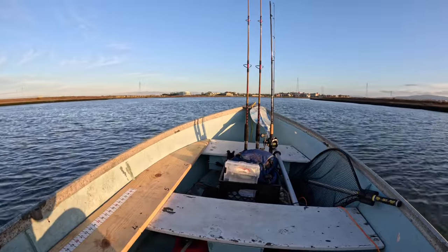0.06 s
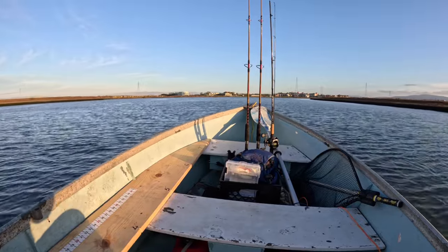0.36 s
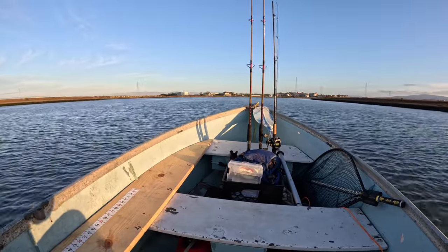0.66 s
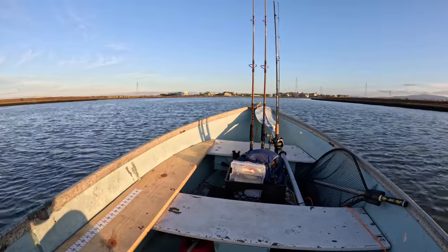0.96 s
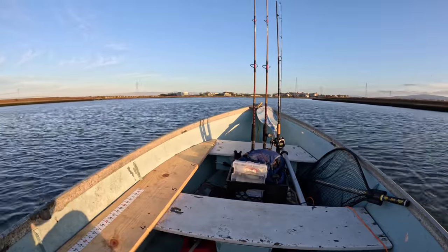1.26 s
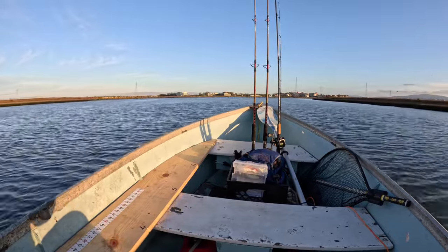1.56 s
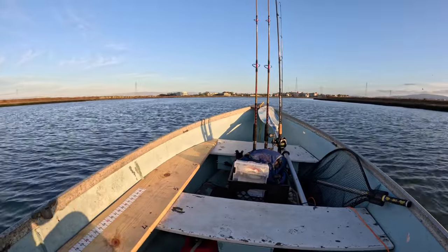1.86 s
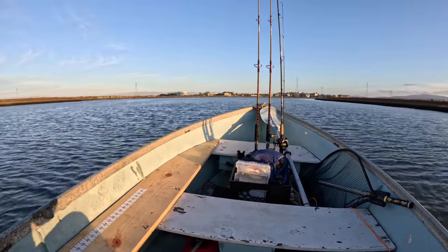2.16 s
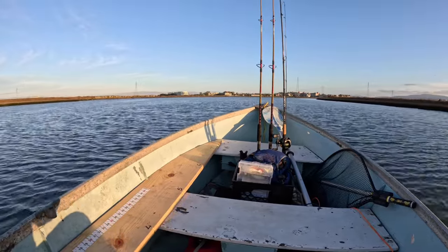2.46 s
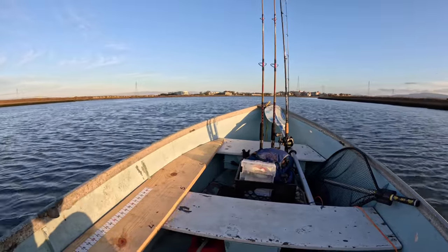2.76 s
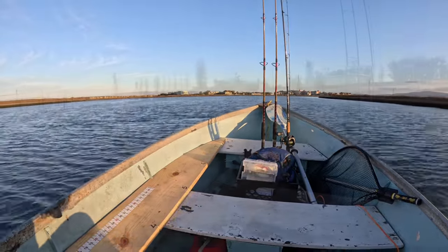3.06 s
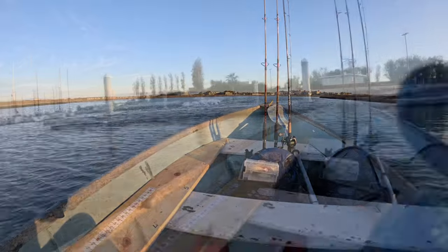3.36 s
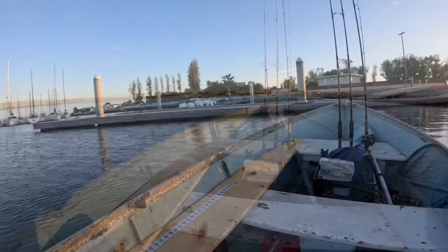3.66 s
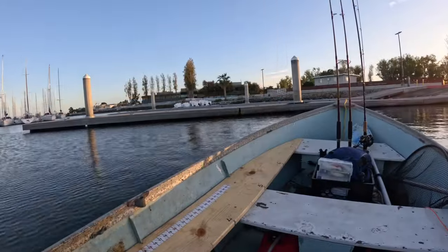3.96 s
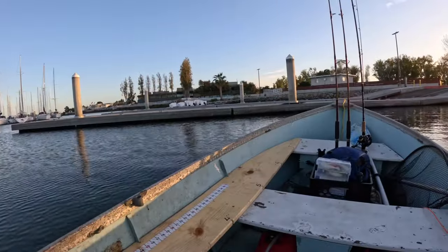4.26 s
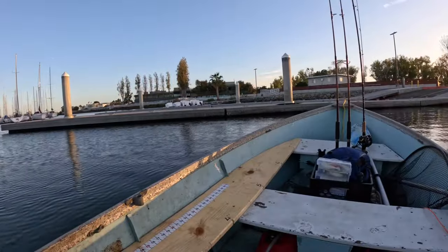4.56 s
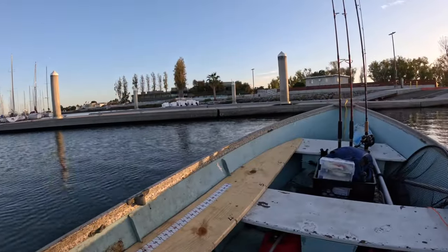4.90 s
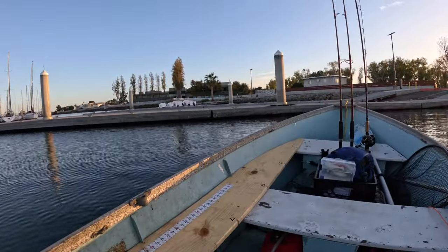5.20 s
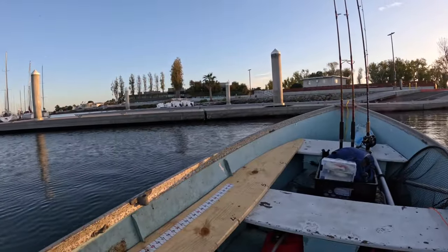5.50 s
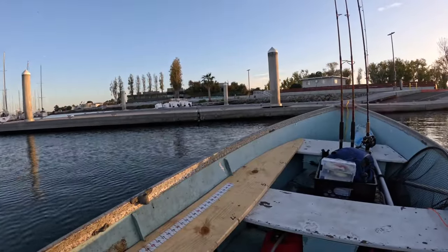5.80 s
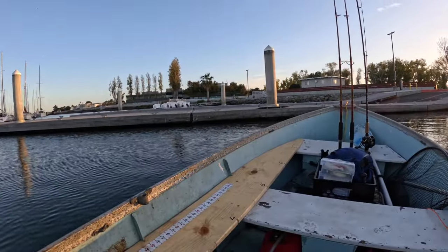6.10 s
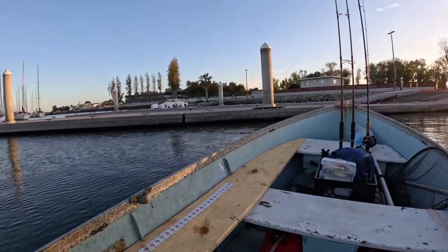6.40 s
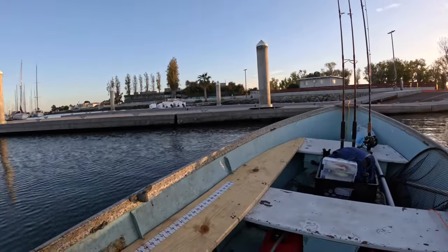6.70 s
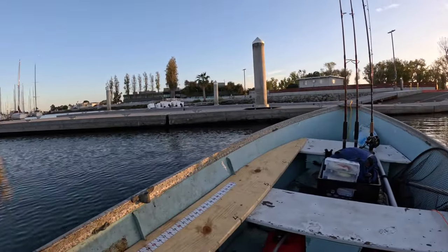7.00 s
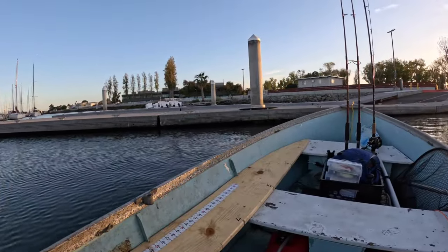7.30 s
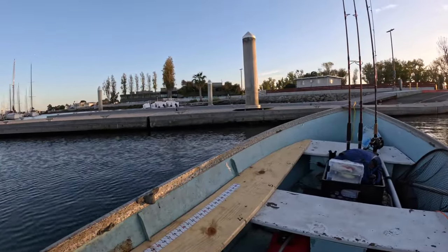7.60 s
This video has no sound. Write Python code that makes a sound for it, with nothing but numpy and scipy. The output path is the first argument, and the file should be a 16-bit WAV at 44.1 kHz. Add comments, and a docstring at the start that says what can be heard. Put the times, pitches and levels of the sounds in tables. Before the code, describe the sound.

A skiff runs across open water, its outboard motor holding one loud note above the wash of the bow. The drone gives way to a lower, quieter throb that keeps slowing and turns uneven, with water gurgling alongside. A short dry creak comes next, then a soft hiss of foam. The microphone is in the boat, catching little slaps on the hull, faint ticks and a low rumble of wind.

```python
"""A small boat with a four-stroke outboard motor, heard from aboard. First the motor drones at cruising
speed over the rush of the bow wave. From about 3 to 4 s that fades into slow running, and the throttle
eases to a lumpy putter that booms in the hull. Near 5.6 s a fitting creaks for half a second as it
sticks and slips; then a small wave breaks into fizzing foam. All along, water slaps the hull, loose gear
ticks and wind brushes the microphone."""
import sys
import numpy as np
from scipy.fft import rfft, irfft, next_fast_len
from scipy.io import wavfile
from scipy.ndimage import uniform_filter1d, map_coordinates

SR = 44100
rng = np.random.default_rng(int(sys.argv[2]) if len(sys.argv) > 2 else 0)


def wrap_up_sound(samples):
    """Save the sound to the file named by the first command line argument, as 16-bit audio."""
    columns = np.atleast_2d(samples).T
    # keep every value between -1 and 1, then stretch to whole-number steps
    tamed = np.clip(columns, -1, 1)
    steps = np.round(tamed * 32767).astype(np.int16)
    wavfile.write(sys.argv[1], SR, steps)


N = 346185

# crests and troughs that the boat runs through: (time [s], half length [s], rise [dB])
WAVE_CRESTS = [(1.78, 0.038, 4.5), (2.04, 0.038, 1), (2.82, 0.12, 1), (3.22, 0.073, 1), (4.62, 0.16, 5.5),
               (5.6, 0.29, -1), (6.26, 0.054, 1.5), (6.78, 0.24, 1)]
# the motor slows as the throttle is eased in steps: (time [s], crankshaft speed [Hz])
SLOW_SPEED = [(3.7, 47.9), (4.02, 48.8), (4.57, 48.4), (4.68, 47.8), (4.76, 46.6), (4.96, 45.6),
              (5.19, 45.0), (5.33, 43.9), (5.54, 43.3), (5.81, 43.0), (6.0, 41.5), (6.12, 39.6),
              (6.33, 38.6), (6.52, 35.9), (6.69, 36.1), (7.04, 33.8), (7.45, 32.8), (7.85, 32.6)]
SMOOTH_HZ, LUMPY_HZ = 48, 43  # firing is almost even above the first speed, lumpy below the second


def amp(db):
    """Decibels to gain."""
    return 10 ** (np.asarray(db) / 20)


def unit(x):
    """Scale to rms 1."""
    return x / np.sqrt(np.mean(x ** 2) + 1e-20)


def curves(rows):
    """One value per sample for each column after the time."""
    s, *cols = np.transpose(rows)
    return [np.interp(np.arange(N) / SR, s, c) for c in cols]


def wobble(rate):
    """A smooth random curve, rate knots a second."""
    return map_coordinates(rng.standard_normal(int(N * rate / SR) + 4), [np.arange(N) * rate / SR])


def coloured(x, spectrum):
    """x through a causal filter with the given (Hz, dB) points, falling away beyond both ends."""
    m = 2 * next_fast_len(N // 2 + SR // 4)
    f, db = np.transpose(spectrum)
    log_hz = np.log(np.fft.rfftfreq(m, 1 / SR) + 1)
    gain_db = np.interp(log_hz, np.log(np.r_[f[0] / 2, f, f[-1] * 2]), np.r_[db[0] - 20, db, -100])
    cepstrum = irfft(np.log(amp(gain_db)))
    cepstrum[1:m // 2] *= 2  # minimum phase: nothing rings before it is struck
    cepstrum[m // 2 + 1:] = 0
    return irfft(rfft(x, m) * np.exp(rfft(cepstrum)), m)[:N]


def resonate(x, modes):
    """x through damped resonances."""
    m = next_fast_len(N + SR // 2)
    f = np.fft.rfftfreq(m, 1 / SR)
    return irfft(rfft(x, m) * sum(amp(db) * 1j * f * w / (c * c - f * f + 1j * f * w)
                                  for c, w, db in modes), m)[:N]


def rush(spectrum, gate=1):
    """Gated noise in a spectrum, rms 1."""
    return unit(coloured(gate * rng.standard_normal(N), spectrum))


def bubbles(per_second, centre_hz, cycles, spread_db, size=900):
    """Damped, slightly rising rings of random pitch and strength, rms 1."""
    u = rng.random((int(per_second * N / SR), 3))
    hz = centre_hz * 2 ** (2 * u[:, 1:2] - 1)
    turns = hz * np.arange(size) / SR
    age = turns / cycles
    ring = (np.sin(2 * np.pi * turns * (1 + 0.06 * np.minimum(age, 2)))
            * np.exp(-2 * age) * (1 - np.exp(-2 * turns)))
    ring *= amp(spread_db * u[:, 2:] ** 4)
    at = (u[:, :1] * N).astype(int) + np.arange(size)
    return unit(np.bincount(at.ravel(), ring.ravel(), N)[:N])


def knocks(rows, t60, attack_cycles, width, size=8192):
    """Each contact is a short swell of noise that rings about its own pitch; high ones start faster."""
    out, t, f = np.zeros(N + size), np.arange(size) / SR, np.fft.rfftfreq(size, 1 / SR)
    for s, db, hz in rows:
        band = 1 / (1 + ((f - hz) / (width * hz)) ** 2)
        ring = unit(irfft(band * np.exp(2j * np.pi * rng.random(len(f)))))
        out[round(s * SR):][:size] += (amp(db - 60 * t / t60)
                                       * (1 - np.exp(-t * hz / attack_cycles)) * ring)
    return out[:N]


def swells(rows):
    """A rise in dB made of bell-shaped humps (s, half length s, dB)."""
    t = np.arange(N) / SR
    return sum(db * np.exp(-((t - s) / half) ** 2) for s, half, db in rows)


def wind(slow_share):
    """The headwind buffets the microphone, less as the boat slows."""
    # gusts and lulls: (time [s], half length [s], rise [dB])
    gusts = [(.08, 0.11, 0), (1.78, 0.19, 4.5), (2.7, 0.19, 4.5), (4.27, 0.14, -8), (4.9, .12, 3),
             (5.4, 0.09, 5.5), (5.95, .1, -5), (6.95, 0.18, 5)]
    # the deep rumble of the air: (frequency [Hz], level [dB])
    buffet_spectrum = [(12, -10.5), (25, -3), (50, -2.5), (90, -4.5), (130, -6.5), (250, -11)]
    shaft_hz, = curves(SLOW_SPEED)
    fast_db, slow_db = -28.5, -29 + 9 * np.log2(shaft_hz / SMOOTH_HZ)
    wind_db = (1 - slow_share) * fast_db + slow_share * slow_db + swells(gusts)
    return amp(wind_db + 0.57 * wobble(7.4) + 0.43 * wobble(20)) * rush(buffet_spectrum)


def loose_gear():
    """Loose things aboard knock together with light ticks."""
    # each tick: (time [s], relative level [dB], pitch [Hz])
    ticks = [(.141, -46, 4450), (.325, -35, 2130), (.425, -51, 4450), (1.174, -45, 4065),
             (1.258, -47, 3860), (1.342, -49, 4800), (4.255, -46, 3350), (4.368, -52, 3500),
             (6.14, -46, 3250), (7.726, -46.5, 4150)]
    return amp(1.5) * knocks(ticks, t60=0.087, attack_cycles=6, width=0.32)  # t60: seconds to fade


def flung_drops():
    """Single drops of water tap the hull."""
    # each drop: (time [s], level [dB], pitch [Hz])
    drops = [(3.884, -51, 5600), (3.946, -54, 7200), (4.09, -56, 8600), (4.245, -57, 8400),
             (4.629, -46.5, 5000), (5.258, -43.5, 4580), (6.473, -45, 3500), (6.695, -47, 4200),
             (7.081, -57, 6700), (7.445, -55, 5170)]
    return knocks(drops, t60=0.032, attack_cycles=3.6, width=.2)


def fine_spray():
    """A mist of tiny drops patters briefly, around 4 s."""
    # the mist's high hiss: (frequency [Hz], level [dB])
    mist_spectrum = [(4000, -7), (7000, 0), (9000, -1.5), (11000, -8), (14000, -17.5)]
    mist = unit(coloured(bubbles(1400, 7500, cycles=3, spread_db=7, size=200), mist_spectrum))
    return amp(-66.5) * swells([(3.95, .42, 1)]) * mist


def breaking_wave():
    """A small wave breaks and its foam hisses along the side."""
    # the foam's fizz: (frequency [Hz], level [dB])
    fizz_spectrum = [(1800, -20), (3500, 7), (6000, 0.5), (8000, -3), (9500, -12), (12000, -14),
                     (15000, -30)]
    start_s, rise_s, hold_s, fall_s = 6.36, 0.096, 0.23, 0.27
    times = start_s + np.cumsum([0, rise_s, hold_s, fall_s])
    envelope = np.interp(np.arange(N) / SR, times, [0, 1, 1, 0])
    return envelope * amp(-55.5 + 1.8 * wobble(60)) * rush(fizz_spectrum)


def hull_slaps():
    """Small waves slap the hull; the high 2.1 kHz knock near 3.1 s is a brief rattle."""
    # each slap: (time [s], relative level [dB], pitch [Hz])
    slaps = [(.134, -38.5, 1140), (.645, -40, 1000), (1.245, -30, 820), (1.348, -42, 1160),
             (1.784, -34.5, 1150), (1.888, -36, 1150), (2.017, -33.5, 1260), (2.1, -36, 1020),
             (2.351, -39, 1440), (2.85, -35, 1250), (3.07, -43, 2130), (3.329, -36, 1300), (4.61, -34, 373),
             (5.245, -33, 1050), (5.98, -26.5, 564), (6.26, -34, 1000), (6.64, -23, 368), (7.03, -32, 495)]
    return amp(3) * knocks(slaps, t60=.17, attack_cycles=7, width=.22)


def creak():
    """A fitting sticks and slips; every slip is a burst of rubbing noise that makes it ring."""
    # quick runs of slips: (time [s], length [s], relative level [dB], slip rate [Hz])
    slip_runs = [(5.594, 0.032, -43, 180), (5.607, 0.1, -30.5, 150), (5.83, 0.022, -46, 130),
                 (5.854, 0.036, -37, 210), (5.902, 0.076, -36.5, 190)]
    # single snaps: (time [s], relative level [dB])
    snaps = [(5.607, -47), (5.743, -22), (5.773, -26), (5.856, -32), (5.883, -42), (5.902, -42),
             (6.021, -28)]
    # the notes the fitting rings at: (pitch [Hz], width [Hz], level [dB])
    fitting_notes = [(990, 87, 7), (1570, 68, 2), (2300, 80, 4), (2890, 110, 1), (3760, 120, 2),
                     (5050, 140, 1.5), (5990, 150, -10), (6600, 170, -3.5)]
    # the dry rasp of rubbing: (frequency [Hz], level [dB])
    rasp_spectrum = [(500, -5), (740, 12), (1050, -16), (1350, -10), (1600, -10.5), (2400, -6.5),
                     (3850, -3.5), (4400, -12.5), (6000, -15.5), (7200, -29), (7700, -26), (9000, -30),
                     (11000, -38), (14000, -55)]
    t = np.arange(N) / SR
    rubbing = np.zeros(N)
    for s, length, db, slip_hz in slip_runs:
        since_slip = np.cumsum(slip_hz * (1 + 0.23 * wobble(83))) / SR % 1
        envelope = np.clip((t - s) / 0.0018, 0, 1) * np.clip((s + length - t) / 0.015 + .5, 0, 1)
        rubbing += envelope * amp(db - 31 * np.clip(t - s, 0, 1)) * np.exp(-1.1 * since_slip)
    for s, db in snaps:
        rubbing += (t > s) * amp(db - 9.5 - 60 * np.clip(t - s, 0, 1) / 0.05)
    scrape = rubbing * rng.standard_normal(N)
    soften = [(900, 11.5), (7000, -2.5), (9000, -12.5), (14000, -25.5)]  # (frequency [Hz], gain [dB])
    ring = unit(coloured(resonate(scrape, fitting_notes), soften))
    rasp = unit(coloured(scrape, rasp_spectrum))
    return amp(4) * np.std(scrape) * unit(rasp + 0.6 * ring)


def lapping_water(puffs, strokes, patter_db):
    """Water gurgles and splashes along the slow hull, pulsing with the motor; fine drops fall back."""
    # how loud the water is between crests: (time [s], gurgle level [dB], splash level [dB])
    water_levels = [(4.35, -39.5, -45), (4.9, -42.5, -43.5), (5.3, -40.5, -39.5), (5.75, -39, -38),
                    (6.45, -41, -45), (7.3, -45.5, -49.5), (7.85, -43.5, -46)]
    # the low gurgle: (frequency [Hz], level [dB])
    gurgle_spectrum = [(250, -28), (380, 2.5), (470, -1.5), (640, 0), (850, -13.5), (1500, -41)]
    # the brighter splash: (frequency [Hz], level [dB])
    splash_spectrum = [(500, -18.5), (780, -3), (1000, -3.5), (1150, -6), (1450, -9.5), (1750, -15.5),
                       (2300, -16), (4000, -44.5)]
    gurgle_db, splash_db = curves(water_levels) + swells(WAVE_CRESTS)
    bubbling = bubbles(170, 900, cycles=10, spread_db=6)
    gurgle = unit(rush(gurgle_spectrum, puffs) + .4 * unit(coloured(bubbling, gurgle_spectrum)))
    splash = unit(rush(splash_spectrum, strokes) + .65 * unit(coloured(bubbling, splash_spectrum)))
    droplets = amp(splash_db - 11) * bubbles(200, 1900, cycles=8, spread_db=7)
    patter = amp(patter_db) * bubbles(90, 3100, cycles=6, spread_db=7)
    spatter = amp(splash_db - 30) * bubbles(70, 4400, cycles=6, spread_db=8)
    return amp(gurgle_db) * gurgle + amp(splash_db) * splash + droplets + patter + spatter


def bow_wash(firing, wave_db):
    """At speed the bow pushes up bubbling water, louder at each crest, and throws hissing spray."""
    # the rushing water: (frequency [Hz], level [dB])
    wash_spectrum = [(300, -13), (650, 0), (900, 2.5), (1150, -3.5), (1350, -8), (2000, -10), (2400, -15.5),
                     (2900, -16), (3700, -27.5), (4500, -43.5), (7000, -57.5)]
    # the spray: (frequency [Hz], level [dB])
    spray_spectrum = [(1500, -21.5), (3600, 7), (5000, -1), (6500, -6.5), (8700, -7), (10800, -16),
                      (12500, -26), (15000, -45)]
    wash_db = -35.5 + 0.93 * wave_db + 0.92 * wobble(12)
    wash = unit(rush(wash_spectrum, firing) + 0.27 * bubbles(300, 1100, cycles=5.3, spread_db=13.5))
    spray = amp(-55 + 1.4 * wobble(45)) * rush(spray_spectrum, np.sqrt(np.abs(firing)))
    return amp(wash_db) * wash + spray


def valve_clatter(shaft_hz, turns, strokes, level_db):
    """The valves clatter every second turn of the crankshaft and make the motor's cover ring."""
    # the metallic clatter: (frequency [Hz], level [dB])
    clatter_spectrum = [(1000, -22), (1720, 2), (2420, -6.5), (3020, -3), (3460, -9.5), (4600, -14),
                        (6000, -19), (7000, -24), (8400, -24), (9500, -32), (11000, -33), (12000, -51.5),
                        (14200, -67)]
    # the notes the cover rings at: (pitch [Hz], width [Hz], level [dB])
    cover_notes = [(983, 39, 6), (3040, 93, -12.5)]
    depth_db = 3.2 * np.interp(shaft_hz, [36, 44], [1, .55])  # the ticks stand out more at idle
    ticking = strokes * amp(depth_db * np.cos(np.pi * turns))
    clatter = amp(level_db) * rush(clatter_spectrum, ticking)
    cover = amp(-50.5) * unit(resonate(ticking * rng.standard_normal(N), cover_notes))
    return clatter + cover


def slow_exhaust(turns, lumpy):
    """Two unequal cylinders thump unevenly and make the hull ring, at a steady overall loudness."""
    # the tones in the thumps: (pitch [x crankshaft speed], part-throttle level [dB], idle level [dB])
    tones = [(1, 0, -8), (1.5, -16, -17), (2, -11, -9), (3, -12.5, -7), (3.5, -21, -9), (4, -4, -4),
             (4.5, -25, -4), (5, -3.5, -.5), (5.5, -16, -6.5), (6, -2, -4), (6.5, -22, -18), (7, -15, -8.5),
             (8, -17, -8.5), (9, -25, -11), (10, -13, -19.5), (11, -20.5, -17), (12, -20.5, -25)]
    # the hull boosts each tone that slides through one of its peaks: (frequency [Hz], gain [dB])
    hull_response = [(35, 1.5), (60, -3.5), (88, 3), (105, -4), (131, -0.5), (142, 3), (165, 1), (181, 5),
                     (194, 7.5), (205, 0.5), (228, 5.5), (248, 1), (262, -5), (292, -.5), (325, 1.5),
                     (352, 2.5), (440, -3.5), (600, 0.5)]
    thumps = np.zeros(N)
    for multiple, part_db, idle_db in tones:
        db = part_db + (idle_db - part_db) * lumpy + (.7 + 1.3 * lumpy) * wobble(9)
        burble_rad = .25 * multiple ** 2  # higher tones arrive later: each thump is a rising burble
        scatter_rad = lumpy ** 2 * wobble(3)  # the tones line up loosely at idle
        thumps += amp(db) * np.sin(2 * np.pi * multiple * turns - burble_rad - scatter_rad)
    chug_db = 1.2 * lumpy * wobble(17)
    ringing = coloured(thumps * amp(chug_db), hull_response)
    power = uniform_filter1d(ringing ** 2, int(.16 * SR))  # averaged over 0.16 s, so thumps still differ
    return ringing / np.sqrt(np.abs(power) + 1e-9)


def fast_exhaust(angle):
    """Two cylinders fire so fast that they drone; each tone wavers as the propeller's load changes."""
    # the tones in the drone: (pitch [x crankshaft speed], relative level [dB])
    tones = [(1, -15.5), (2, -2.5), (3, -8), (4, -3), (5, -33), (6, 0.5), (7, -11), (8, -15), (9, -21.5),
             (10, -17), (11, -31), (12, -19), (14, -29.5), (15, -32.5), (16, -31), (17, -38), (18, -36.5),
             (20, -28), (22, -40), (24, -39), (28, -38), (30, -34), (32, -42.5), (37, -43.5), (52, -48.5)]
    # weaker tones waver more: (tone level [dB], waver [dB])
    waver_depths = [(-25, 2.3), (-14, 1.9), (-3, 1.3), (0, .45)]
    drone = np.zeros(N)
    for multiple, db in tones:
        waver_db = np.interp(db, *np.transpose(waver_depths))
        drift_rad = .07 * waver_db * wobble(16) + 2 * np.pi * rng.random()
        drone += amp(db + waver_db * wobble(14)) * np.sin(multiple * angle + drift_rad)
    return np.sqrt(2) * drone


def puttering():
    """Slow running: the exhaust throbs and booms in the hull, over valve clatter and lapping water."""
    # the exhaust's loudness as the propeller's load comes and goes: (time [s], level [dB])
    load_levels = [(3.7, -26), (4.12, -26), (4.3, -27), (4.48, -25), (4.63, -21.5), (4.78, -28),
                   (4.97, -26), (5.35, -29.5), (5.46, -25), (5.73, -23), (5.87, -25.5), (5.98, -25),
                   (6.1, -28.5), (6.24, -22.5), (6.37, -26), (6.51, -29), (6.63, -24), (6.93, -25.5),
                   (7.27, -31.5), (7.45, -29), (7.72, -27), (7.85, -27.5)]
    # the booming noise in the hull: (frequency [Hz], level [dB])
    boom_spectrum = [(70, -20), (125, -9), (158, -4), (195, 1), (240, -4), (300, -4.5), (380, -9),
                     (500, -22), (900, -34)]
    shaft_hz, = curves(SLOW_SPEED)
    load_db, = curves(load_levels)
    lumpy = np.interp(shaft_hz, [LUMPY_HZ, SMOOTH_HZ], [1, .12])
    turns = np.cumsum(shaft_hz) / SR + .013 * lumpy * wobble(18)  # lumpy thumps come early or late
    strokes = 1 + 0.1 * np.cos(2 * np.pi * turns)
    puffs = 1 + .4 * np.cos(2 * np.pi * (turns - .4))  # one puff of noise with each thump
    throb = amp(load_db) * slow_exhaust(turns, lumpy)
    boom = amp(load_db - 12.5 + 6 * lumpy) * rush(boom_spectrum, puffs)
    swell_db = -59 + swells([(5.3, 1, 8.9)]) + 0.57 * swells(WAVE_CRESTS)  # shared by patter and clatter
    water = lapping_water(puffs, strokes, patter_db=swell_db - 13)
    clatter = valve_clatter(shaft_hz, turns, strokes, level_db=swell_db + 3)
    return throb + boom + water + clatter + fine_spray()


def cruising():
    """Fast running: the exhaust drones over the rumbling hull and the bow wash."""
    # the motor's speed, nudged by choppy water: (time [s], crankshaft speed [Hz])
    cruise_speed = [(.15, 72.0), (.4, 71.6), (.6, 71.95), (.87, 71.55), (1.4, 72.0), (1.55, 71.55),
                    (2.2, 72.1), (2.5, 71.5), (2.85, 71.55), (3.1, 72.3), (3.3, 72.35), (3.5, 71.9)]
    # the rumble of the hull: (frequency [Hz], level [dB])
    rumble_spectrum = [(60, -20), (90, 4), (112, -5.5), (165, 0), (194, -1.5), (215, 0), (262, -0.5),
                       (284, 3), (312, -4), (390, -4.5), (480, -6), (580, -10), (700, -20), (1200, -48.5)]
    shaft_hz = curves(cruise_speed)[0] + 0.1097 * wobble(6)
    wave_db = swells(WAVE_CRESTS)
    angle = 2 * np.pi * (np.cumsum(shaft_hz) / SR + 0.0026 * wobble(25))
    drone = amp(-20 - 0.8 * wave_db) * fast_exhaust(angle)  # each crest muffles the exhaust
    firing = 1 + 0.15 * np.cos(angle) + 0.066 * np.cos(2 * angle)  # the noise pulses with the pistons
    rumble = amp(-22.5 + wave_db) * rush(rumble_spectrum, firing)
    return drone + rumble + bow_wash(firing, wave_db)


def scene():
    """The fast run fades out as the slow one fades in, with the smaller sounds on top."""
    slow_share = np.interp(np.arange(N) / SR, [2.97, 3.926], [0, 1])
    boat = (1 - slow_share) * cruising() + slow_share * puttering()
    water = flung_drops() + hull_slaps() + breaking_wave()
    return boat + water + creak() + loose_gear() + wind(slow_share)


def record(dry):
    """One channel with softly faded ends and the highest treble cut off."""
    fade_s, top_hz = .004, 14400
    m = next_fast_len(N + SR // 2)
    fade_in = np.minimum(np.arange(N) / (fade_s * SR), 1)
    spectrum = rfft(dry * fade_in * fade_in[::-1], m)
    below_top = np.fft.rfftfreq(m, 1 / SR) < top_hz
    return irfft(spectrum * below_top, m)[:N].reshape(1, N)


dry = scene()
out = record(dry)
wrap_up_sound(out)
```